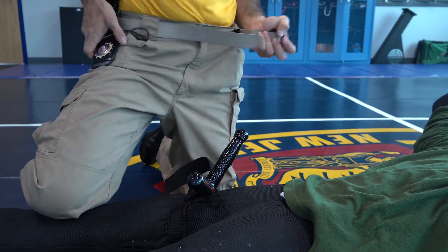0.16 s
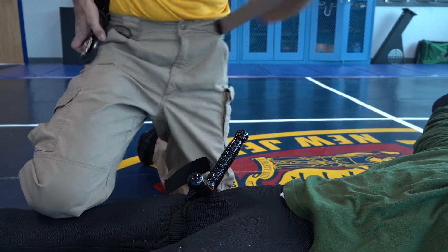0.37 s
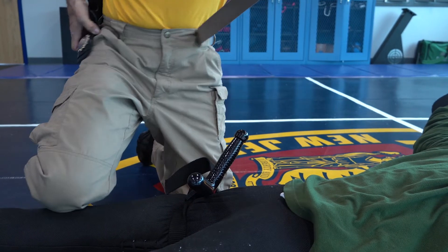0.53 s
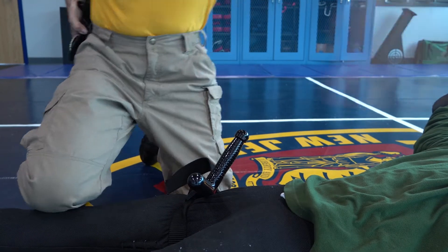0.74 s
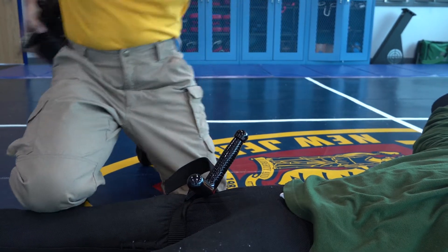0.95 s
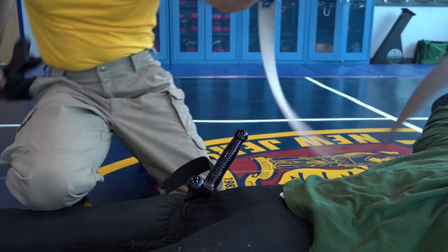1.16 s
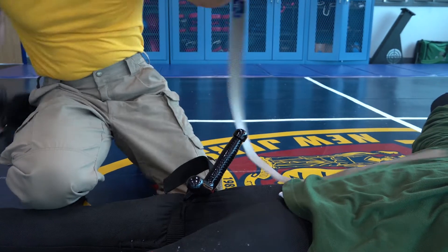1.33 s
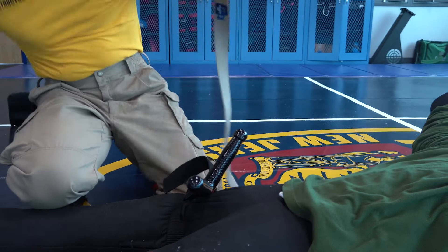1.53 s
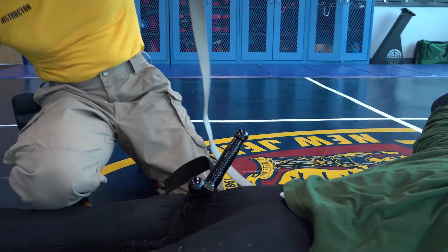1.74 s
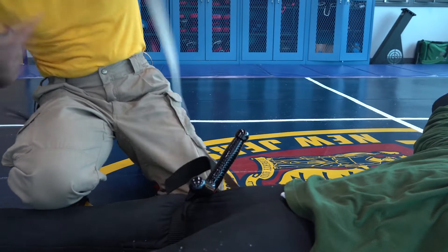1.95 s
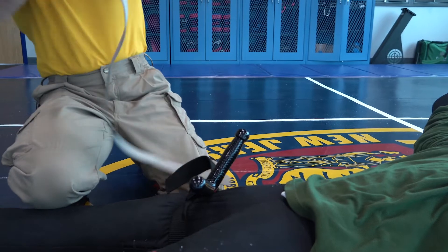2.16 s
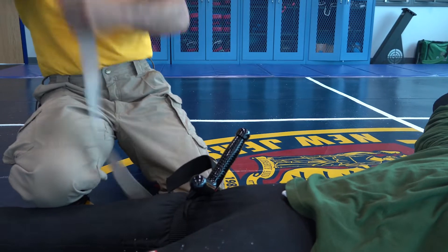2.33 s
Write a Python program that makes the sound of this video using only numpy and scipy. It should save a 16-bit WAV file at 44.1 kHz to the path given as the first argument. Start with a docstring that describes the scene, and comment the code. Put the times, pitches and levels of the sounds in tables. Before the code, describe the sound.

A webbing belt is pulled quickly through trouser loops, close up: a short gear creak at 0 s, then a buzzy rasp rising in pitch from 0.2 to 0.6 s, with sharp clicks near 0.34 and 0.43. Another creak at 0.7-0.8, soft knocks around 1.1-1.45, a clattering cluster with cloth rustle at 1.6, loud snaps at 2.13, a faint strap swish at the end. Reverberant hall, faint ventilation rumble.

```python
"""A gym hall, close to the microphone: a webbing belt is pulled through trouser loops, its woven ribs
rasping over the cloth as wobbling partials at a pitch set by the pulling speed. Stiff gear creaks as runs
of slips ringing its modes; small hard parts click and soft knocks ring dully, from short pushes and noise
bursts. Cloth rustles in grains and the strap swishes through the hand in flickering streaks of noise.
Ventilation rumbles as coloured noise; the hall rings on through feedback delays and sprays of echoes."""
import sys
import numpy as np
from scipy import signal
from scipy.fft import rfft, irfft, next_fast_len
from scipy.io import wavfile

SR = 44100
rng = np.random.default_rng(int(sys.argv[2]) if len(sys.argv) > 2 else 0)


def gain_from_db(level_db):
    """Convert decibel levels to linear amplitude factors (20 dB per decade)."""
    decades = np.asarray(level_db, float) / 20
    return 10 ** decades


def waveform_to_disk(signal):
    """Save audio, clipped to [-1, 1], as 16-bit WAV at the path in sys.argv[1]."""
    frames = np.transpose(np.atleast_2d(signal))
    scaled = np.clip(frames, -1, 1) * 32767
    samples = np.round(scaled).astype(np.int16)
    wavfile.write(sys.argv[1], SR, samples)


N = 105840   # samples, 2.4 s

# Bright hiss of webbing rubbed along a surface. Each row: frequency in Hz, level in dB per Hz.
WEBBING_HISS = [(1470, -8.5), (2500, 2), (3890, -6.5), (7860, -12.5), (9800, -10.5), (15500, -18)]
FIRST_ECHO_S = .011


def rms_one(x):
    """Scale to rms 1."""
    return x / np.sqrt(np.mean(x ** 2) + 1e-20)


def in_time(rows):
    """Table columns as signals, straight lines between the rows."""
    s, *columns = np.transpose(rows)
    return [np.interp(np.arange(N) / SR, s, c) for c in columns]


def at_hz(points, hz):
    """Read a spectrum on a log frequency axis."""
    point_hz, value = np.transpose(points)
    return np.interp(np.log(hz), np.log(point_hz), value)


def drift(rate):
    """Slow chance with rms 1: noise smoothed twice by a one-pole filter at rate Hz."""
    r = np.exp(-2 * np.pi * rate / SR)
    smooth = signal.lfilter([1], [1, -2 * r, r * r], rng.standard_normal(N + SR))
    return rms_one(smooth[SR:])


def colour(x, spectrum):
    """Give a flat signal a spectrum; rms 1."""
    hz = np.maximum(np.arange(N // 2 + 1) * SR / N, 1)
    return rms_one(irfft(rfft(x) * gain_from_db(at_hz(spectrum, hz)), N))


def ring(x, hz, t60):
    """A damped resonance: a unit click sets a sine of height 1 ringing, down 60 dB after t60 seconds."""
    r, w = gain_from_db(-60 / (t60 * SR)), 2 * np.pi * hz / SR
    return signal.lfilter([0, np.sin(w)], [1, -2 * r * np.cos(w), r * r], x + 1e-18)


def burst(noise, t_s):
    """A short contact: noise dying with time constant t_s, unit energy."""
    b = noise * np.exp(-np.arange(len(noise)) / (t_s * SR))
    return b / np.sqrt(np.sum(b ** 2))


def add(out, s, db, sound):
    """Mix a sound in at time s with its peak at db."""
    i = int(s * SR)
    out[i:i + len(sound)] += (gain_from_db(db) * sound / np.abs(sound).max())[:N - i]


def air():
    """Ventilation rumble and a floor of hiss: coloured noise whose level wavers slightly."""
    # Ventilation in the hall. Each row: frequency in Hz, level in dB per Hz.
    air_spectrum = [(12, 10), (26, -10), (48, -4), (68, -2.5), (92, -23.5), (130, -12), (200, -27.5),
                    (300, -32.5), (450, -24.5), (900, -32), (1350, -29.5), (2100, -35.5), (4000, -47.5),
                    (10000, -41.5), (14000, -55)]
    level_db, waver_db = -31.5, .8
    return gain_from_db(level_db + waver_db * drift(11.0)) * colour(rng.standard_normal(N), air_spectrum)


def cloth():
    """Cloth moving: dense fibre grains in clumps over smooth noise, following the movement."""
    # Strength of the movement. Each row: time in seconds, level in dB before gain and waver.
    movement = [(0, -38), (.09, -50.5), (.18, -54), (.6, -42), (.7, -39), (.8, -42.5), (.87, -48),
                (1.18, -49.5), (1.3, -47.5), (1.4, -43), (1.5, -46.5), (1.57, -38.5), (1.59, -29.5),
                (1.66, -32), (1.75, -42.5), (1.9, -48.5), (2.06, -54), (2.09, -43.5), (2.16, -43.5),
                (2.24, -43), (2.33, -42.5), (2.38, -37.5)]
    # Rustle of the cloth. Each row: frequency in Hz, level in dB per Hz.
    rustle_spectrum = [(120, -12.5), (200, 1), (446, -16), (607, -14.5), (1620, -9), (1810, -11),
                       (3820, -14.5), (9480, -23), (15500, -17)]
    gain_db, waver_db = 0.5, 2.5
    grains_per_s, grain_spread_db = 1800, 0.5   # the rate is the middle one between clumps and gaps
    level_db, = in_time(movement)
    born = rng.random(N) < grains_per_s * gain_from_db(4 * drift(25)) / SR
    grain_db = grain_spread_db * np.minimum(rng.exponential(1, N), 5)
    grains = born * gain_from_db(grain_db) * rng.choice([-1, 1], N)
    mix = rms_one(grains) + 0.95 * rng.standard_normal(N)
    return gain_from_db(level_db + gain_db + waver_db * drift(8.2)) * colour(mix, rustle_spectrum)


def swish():
    """The strap is drawn through the hand: its weave makes flickering narrow streaks on a bright hiss."""
    # Strap against skin. Each row: time in seconds, level of the streaks in dB.
    strap_rows = [(2.24, -54), (2.33, -55), (2.37, -41.5), (2.4, -39)]
    # Streaks of the weave. Each row: frequency in Hz, relative level in dB.
    weave_bands = [(2300, -8), (3200, 0), (3950, 9), (5500, -6)]
    streak_t60_s, flicker_db, hiss_db = 0.018, 6, -1.5
    level_db, = in_time(strap_rows)
    streaks = 0
    for hz, db in weave_bands:
        streak = rms_one(ring(rng.standard_normal(N), hz, streak_t60_s))
        streaks = streaks + gain_from_db(db + flicker_db * drift(15)) * streak
    hiss = gain_from_db(hiss_db) * colour(rng.standard_normal(N), WEBBING_HISS)
    on = np.arange(N) / SR > strap_rows[0][0]
    return gain_from_db(level_db) * on * (rms_one(streaks) + hiss)


def knocks():
    """Soft knocks on the padded floor and body: a push of a quarter cycle starts a dull ring."""
    # Knocks. Each row: start in seconds, peak in dB, ring frequency in Hz.
    knock_rows = [(1.118, -35.5, 234), (1.127, -22.5, 215), (1.25, -27.5, 204), (1.316, -18.5, 179),
                  (1.321, -18.5, 125), (1.328, -18.5, 160), (1.437, -24.5, 245), (1.579, -19.5, 121.4),
                  (1.762, -31.5, 194), (2.27, -34, 185), (2.335, -25.5, 228), (2.348, -26, 225)]
    ring_cycles = 10.1   # until 60 dB down
    overtone, overtone_db = 2.67, -13   # ratio; drive in dB before it is multiplied by the ratio
    out = np.zeros(N)
    for s, db, hz in knock_rows:
        push = np.zeros(5000)
        n = int(.25 * SR / hz)
        push[:n] = np.hanning(n)
        low = ring(push, hz, ring_cycles / hz)
        upper = ring(push, overtone * hz, ring_cycles / hz / 2)
        add(out, s, db, low - gain_from_db(overtone_db) * overtone * upper)
    return out


def clicks():
    """Small hard parts: a brief gritty contact rings a few cycles and throws off a spit of treble."""
    # Hard clicks. Each row: start in seconds, peak in dB, ring frequency in Hz, treble peak in dB,
    # time constant of the contact in seconds before it is held within limits.
    click_rows = [(.144, -28, 1080, -63, 0.00096), (.148, -20.5, 2050, -40, 0.00084),
                  (.337, -5, 710, -2, 0.00017), (.433, -5.5, 1110, -23, 0.000083),
                  (0.559, -17, 800, -27, 0.0068), (0.593, -21.5, 650, -15.5, 0.0014),
                  (1.056, -34, 1610, -33, 0.0025), (1.087, -35, 596, -41, 0.0055),
                  (1.121, -25.5, 714, -32.5, 0.003), (1.194, -31.5, 1550, -37, 0.0018),
                  (1.252, -30, 710, -38.5, 0.0023), (1.316, -20, 577, -50, 0.011),
                  (1.322, -20.5, 1700, -23, 0.0068), (1.328, -17, 590, -48, 0.0013),
                  (1.359, -29.5, 2780, -43, 0.0018), (1.437, -25, 2180, -54, 0.0013),
                  (1.471, -32, 1310, -32.5, 0.0023), (1.561, -29, 703, -51, 0.0032),
                  (1.576, -16.5, 680, -10.5, 0.0013), (1.584, -23, 1070, -3, 0.0032),
                  (1.587, -10, 1080, -36, 0.0011), (1.609, -32, 1310, -15, 0.0039),
                  (1.622, -11, 990, -14, 0.0018), (1.627, -15.5, 1330, -8.5, 0.0037),
                  (1.651, -18.5, 900, -17, 0.0017), (1.764, -28.5, 1510, -28.5, 0.0023),
                  (2.075, -26, 1070, -56, 0.0023), (2.08, -24, 2630, -31, 0.00067),
                  (2.113, -21.5, 2500, -40, 0.0004), (2.132, -5, 1970, -20.5, 0.0016),
                  (2.136, -1, 1450, -10, 0.00016), (2.279, -21, 2960, -32, 0.0033)]
    ring_cycles = 5   # until 60 dB down
    overtones, overtones_db = (.7, 1.7, 2.6), (-11, -3, -4)   # multiples of the ring frequency
    out, noise = np.zeros(N), rng.standard_normal((len(click_rows), 2, 1500))
    treble = signal.butter(2, (4170, 13200), "band", fs=SR, output="sos")
    for (s, db, hz, treble_db, contact_s), (grit, spit) in zip(click_rows, noise):
        near_ring = signal.butter(2, [.45 * hz, 2.5 * hz], "band", fs=SR, output="sos")
        contact = signal.sosfilt(near_ring, burst(grit, np.clip(contact_s, .0001, .006)))
        body = ring(contact, hz, ring_cycles / hz)
        for m, g in zip(overtones, overtones_db):
            body = body + gain_from_db(g) * ring(contact, m * hz, 3 / (m * hz))
        add(out, s, db, body)
        add(out, s, treble_db, signal.sosfilt(treble, burst(spit, np.clip(contact_s, .0005, .006))))
    return out


def creak():
    """Stick-slip of stiff gear: each slip thumps the low modes, snaps the high ones and spits hiss."""
    # Single slips. Each row: start in seconds, peak in dB.
    slip_rows = [(0.0, -27), (0.009, -20.5), (0.027, -21.5), (0.046, -21), (0.708, -22.5), (0.717, -19.5),
                 (0.728, -20), (0.739, -20), (0.748, -23), (0.76, -20), (0.776, -23)]
    # Modes of the gear. Each row: frequency in Hz, mean relative drive in dB, t60 in seconds.
    gear_modes = [(199, -1, 0.12), (299, 3, 0.039), (598, 4, 0.042), (936, -1, 0.012), (1628, -4, 0.038),
                  (2430, -3.5, 0.011), (3580, -4, 0.014)]
    slip_s, hiss_db = .002, -4   # time constant of the hiss; its peak relative to the slip
    out = np.zeros(N)
    noise = rng.standard_normal((len(slip_rows), 4000))
    spread_db = rng.normal(0, 3.0, (len(slip_rows), len(gear_modes)))
    high = signal.butter(2, 3000, "high", fs=SR, output="sos")
    thump, snap = burst(np.ones(4000), slip_s / 4) / 5, burst(np.ones(4000), 1 / SR)
    for (s, db), z, spread in zip(slip_rows, noise, spread_db):
        spit = burst(z, slip_s)
        grate = snap + .5 * spit
        modes = 0
        for k, (hz, g, t60) in enumerate(gear_modes):
            drive = thump if k < 3 else grate
            modes = modes + (-1) ** k * gain_from_db(g + spread[k]) * ring(drive, hz, t60)
        add(out, s, db, modes)
        add(out, s, db + hiss_db, signal.sosfilt(high, spit))
    return out


def belt():
    """Ribs ride over two loops with wobbling speed and grip; unpitched scrub and hiss come along."""
    # The pull. Each row: time in seconds, ribs per second in Hz before wobble,
    # level of ribs with scrub in dB, hiss level in dB.
    pull_rows = [(0.185, 517.4, -43, -41.5), (0.219, 533.8, -23, -35), (0.232, 601.7, -11, -28),
                 (0.236, 447.6, -21, -34), (0.247, 474.4, -12.5, -27), (0.255, 529, -13, -22),
                 (0.267, 584.6, -9.5, -26.5), (0.283, 682.4, -10.5, -26), (0.297, 683.3, -12, -26.5),
                 (0.31, 622.5, -8.5, -23.5), (0.323, 747.6, -15.5, -24), (0.339, 667, -10, -21),
                 (0.352, 702.3, -13, -29.5), (0.369, 733, -13.5, -19), (0.388, 627.4, -10.5, -25),
                 (0.409, 790, -16, -26.5), (0.439, 778, -22.5, -26.5), (0.455, 1053, -22, -29),
                 (0.5, 989, -30.5, -32.5), (0.525, 896, -31.5, -32.5), (0.575, 903, -29, -31.5),
                 (0.593, 808, -27.5, -36.5), (0.61, 834, -62, -40)]
    # Partials at multiples 1, 2, .. of the rib rate: each entry a mean relative level in dB.
    rib_partials_db = [6.5, 3, -5.5, -7.5, -10.5, -13]
    # Scrub under the ribs. Each row: frequency in Hz, level in dB per Hz.
    scrub_spectrum = [(300, -55), (662, -1.5), (929, -20.5), (1420, -6), (1780, -16), (3500, -39),
                      (4550, -39)]
    speed_wobble, wobble_hz, grip_db, grip_hz = .018, 80, 4, 60   # wobble as a share of the rib rate
    second_loop_db, scrub_db = -8, -8
    hiss_gate = 0.28   # depth to which each rib pulses the hiss
    taut_s, taut_rise_s = 0.235, 0.012   # fully taut at taut_s
    slack_s, slack_rise_s, slack_roughness = .42, .03, 1.6
    rate_hz, level_db, hiss_db = in_time(pull_rows)
    t = np.arange(N) / SR
    fade_in = np.clip((t - pull_rows[0][0]) / 0.004 + 1, 0, 1)
    fade_out = np.clip((pull_rows[-1][0] - t) / 0.0087 + 1, 0, 1)
    # the belt pulls taut: only then does the lowest partial sound in full
    taut = np.clip((t - taut_s) / taut_rise_s + 1, .1, 1)
    # the free end slackens: wobble and grip grow uneven
    uneven = 1 + (slack_roughness - 1) * np.clip((t - slack_s) / slack_rise_s, 0, 1)
    ribs = 0
    for loop_db in (second_loop_db, 0):
        wobble = 1 + speed_wobble * uneven * drift(wobble_hz)
        phase = 2 * np.pi * np.cumsum(rate_hz * wobble) / SR
        for k, db in enumerate(rib_partials_db):
            grip = gain_from_db(loop_db + db + grip_db * uneven * drift(grip_hz))
            ribs = ribs + grip * (taut if k == 0 else 1) * np.cos((k + 1) * phase)
    scrub = gain_from_db(scrub_db) * colour(rng.standard_normal(N), scrub_spectrum)
    # the louder loop, last in the loop above, pulses the hiss
    pulsed = rng.standard_normal(N) * (1 + hiss_gate * np.cos(phase))
    hiss = colour(pulsed * gain_from_db(1.1 * uneven * drift(130)), WEBBING_HISS)
    rasp = gain_from_db(level_db) * rms_one(rms_one(ribs) + scrub)
    return fade_in * fade_out * (rasp + gain_from_db(hiss_db) * hiss)


def scatter(x, t60, band_hz):
    """A dense spray of early echoes: decaying noise in a band, swelling up to the first-echo time."""
    t = np.arange(int(.4 * SR)) / SR
    swell = np.clip(t / FIRST_ECHO_S, 0, 1) ** 2
    spray = rng.standard_normal(len(t)) * gain_from_db(-60 * t / t60) * swell
    spray = signal.sosfilt(signal.butter(2, band_hz, "band", fs=SR, output="sos"), spray)
    return signal.fftconvolve(x, spray / np.std(spray) / np.sqrt(len(t)))[:N]


def hall(x):
    """Twelve feedback delays with a decay per band, after the gap to the first echo."""
    # Reverberation of the hall. Each row: frequency in Hz, t60 in seconds.
    hall_decay = [(100, 1), (600, 0.8), (3000, 0.65), (10000, 0.43)]
    size = next_fast_len(N + 2 * SR)
    hz = np.maximum(np.arange(size // 2 + 1) * SR / size, 1)
    lags = np.linspace(.017, .059, 12) * rng.uniform(.95, 1.05, 12)   # seconds
    t60 = np.clip(at_hz(hall_decay, hz), .1, 1.8)
    h = 0
    for k, d in enumerate(lags):
        gap = np.exp(-2j * np.pi * hz * (FIRST_ECHO_S + .2 * (d - lags[0])))
        feedback = gain_from_db(-60 * d / t60) * np.exp(-2j * np.pi * hz * d)
        h = h + (-1) ** k * gap / (1 - feedback)
    for d in (.0047, .0031, .0017):   # all-pass delays in seconds thicken the echoes
        z = np.exp(-2j * np.pi * hz * d)
        h = h * (z - .6) / (1 - .6 * z)
    return irfft(rfft(x, size) * h, size)[:N] / np.sqrt(12)


def scene():
    """All near sounds, the hall and echoes they raise, and the ventilation behind."""
    hits, rasp = clicks() + knocks(), belt() + creak()
    wet = hall(gain_from_db(-18) * hits + gain_from_db(-19) * rasp)
    # echoes off floor, bodies and lockers
    echoes = gain_from_db(-16.5) * scatter(hits, 0.18, (507, 10000))
    # lockers and walls throw the treble back
    sizzle = gain_from_db(-12) * scatter(hits, 0.5, (3460, 11100))
    return (rasp + hits + echoes + sizzle + wet + swish() + cloth() + air())[None]


def low_pass(x):
    """Removes everything above the highest recorded frequency."""
    return signal.sosfilt(signal.butter(12, 15760, fs=SR, output="sos"), x)


def record(dry):
    """The microphone loses the lowest bass and the top; full scale clips; a steep low-pass follows."""
    low_cut = signal.butter(2, 7.9, "high", fs=SR, output="sos")
    top_cut = signal.butter(2, 11600, fs=SR, output="sos")
    steep = signal.cheby2(10, 50, 15900, fs=SR, output="sos")
    mic = signal.sosfilt(np.vstack([low_cut, top_cut]), dry)
    clipped = np.clip(mic, -1, 1)
    return low_pass(signal.sosfilt(steep, clipped))


dry = scene()
out = record(dry)
waveform_to_disk(out)
```